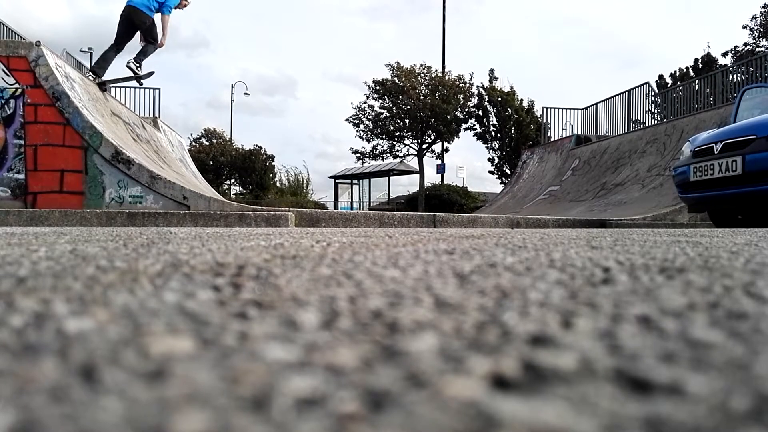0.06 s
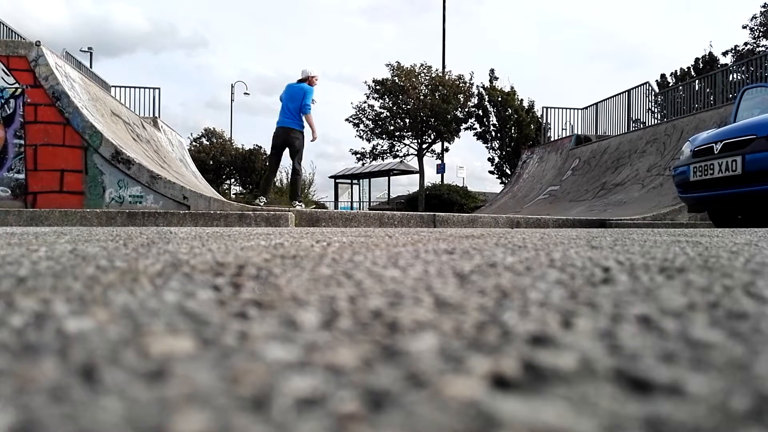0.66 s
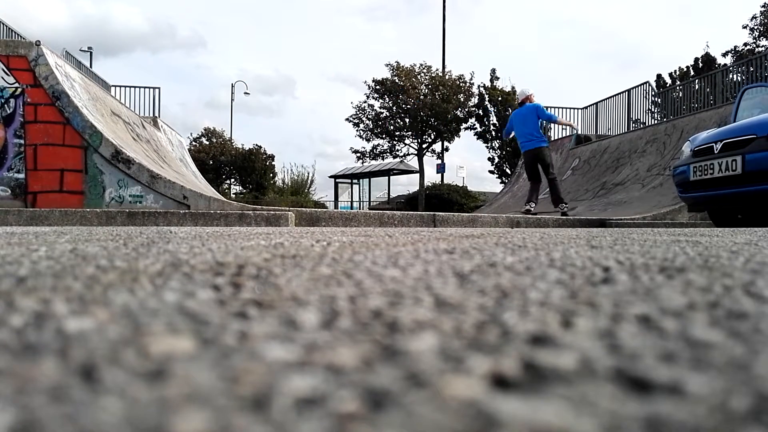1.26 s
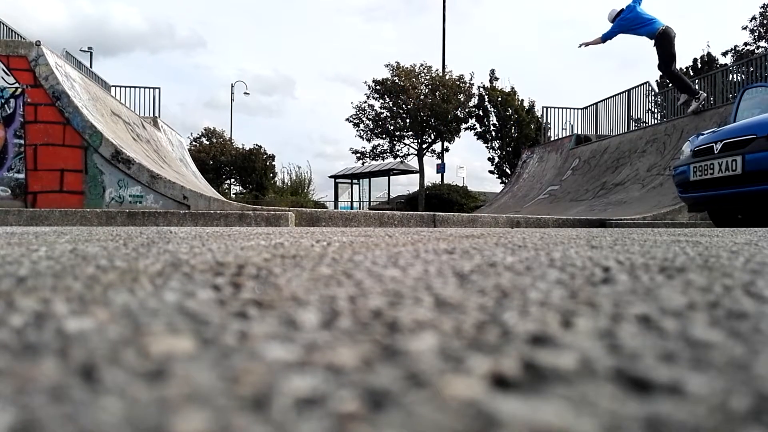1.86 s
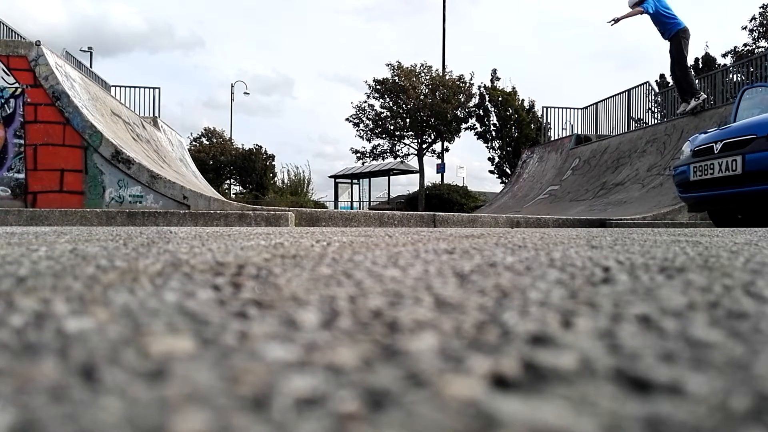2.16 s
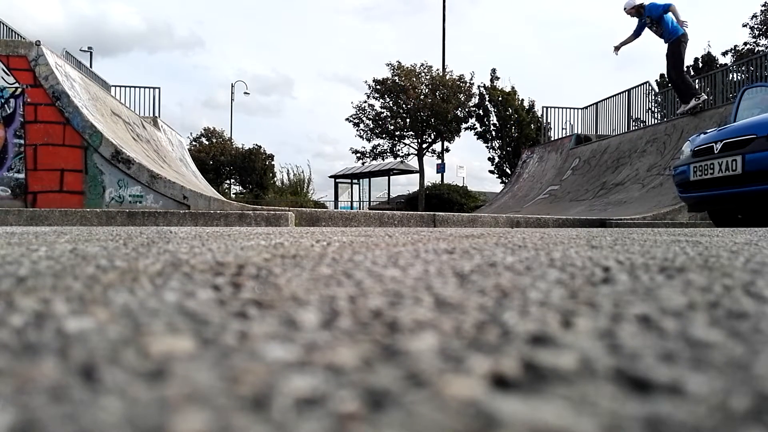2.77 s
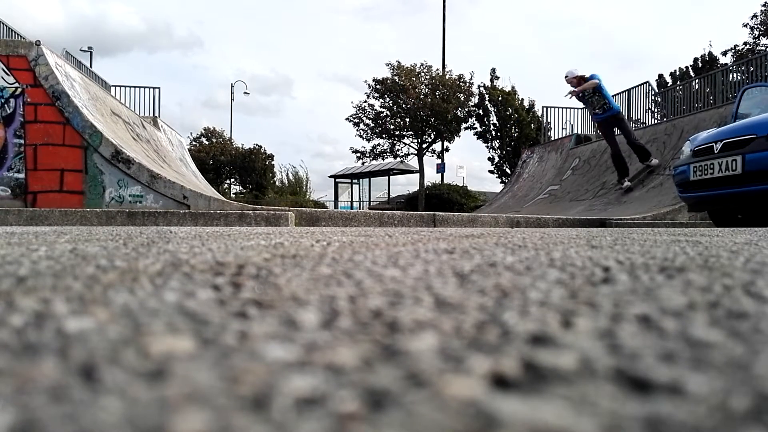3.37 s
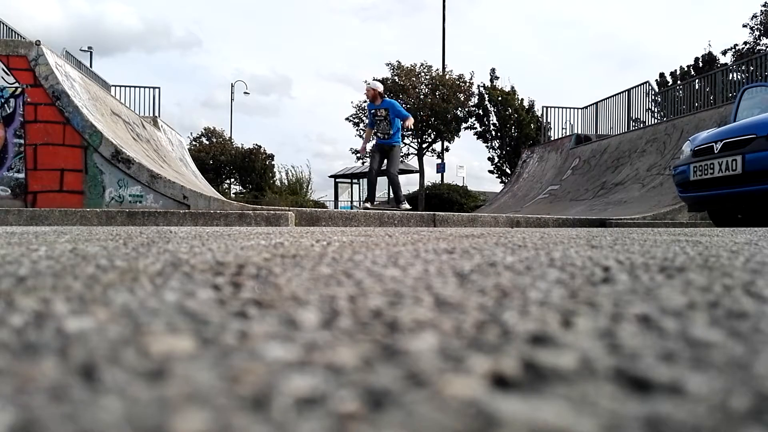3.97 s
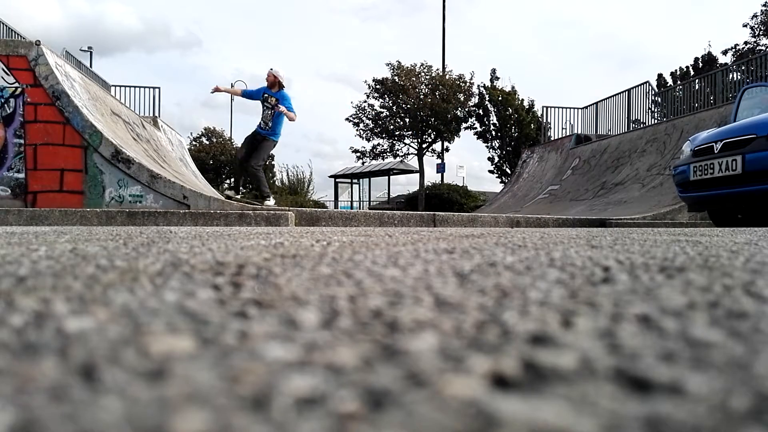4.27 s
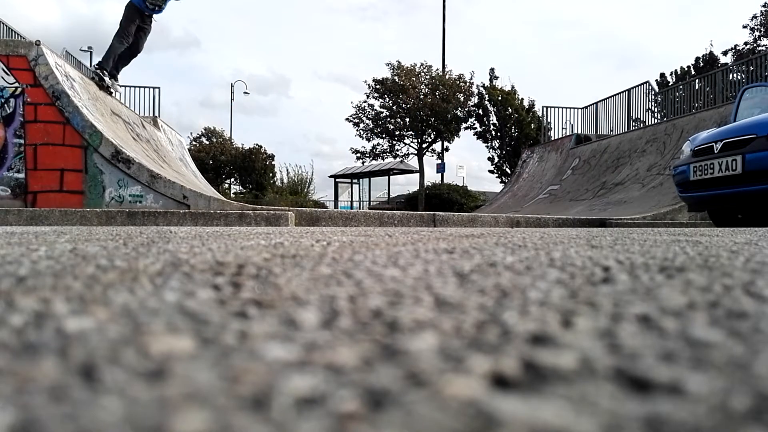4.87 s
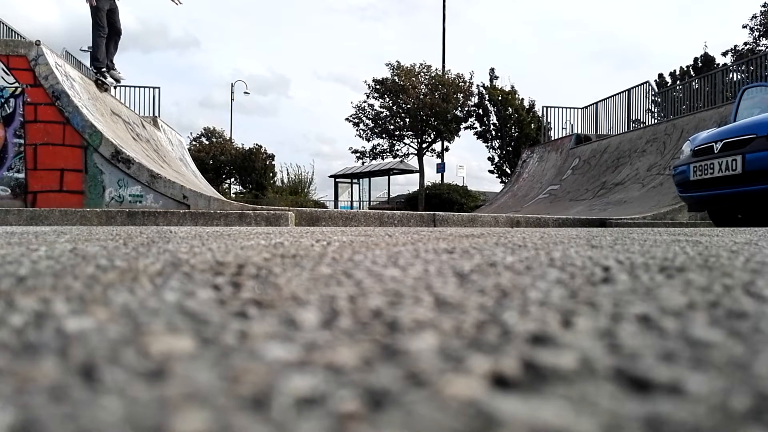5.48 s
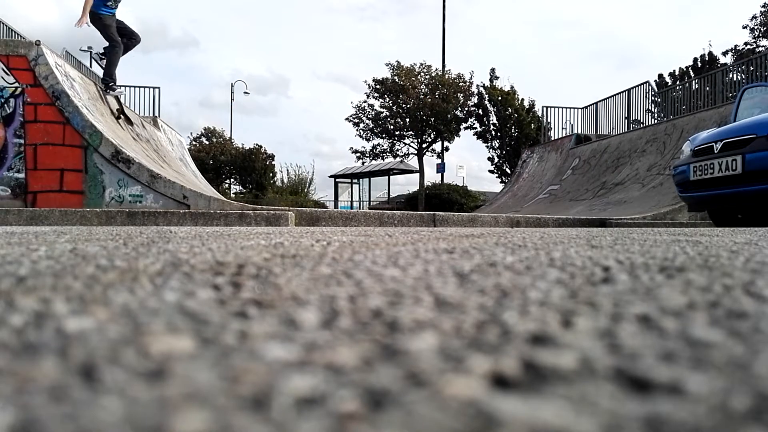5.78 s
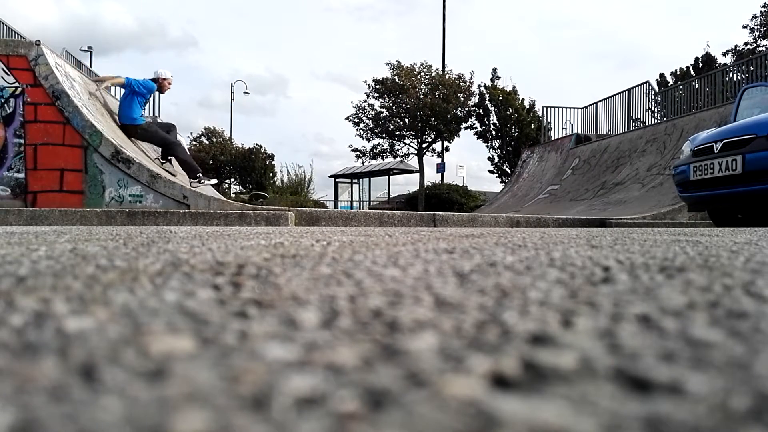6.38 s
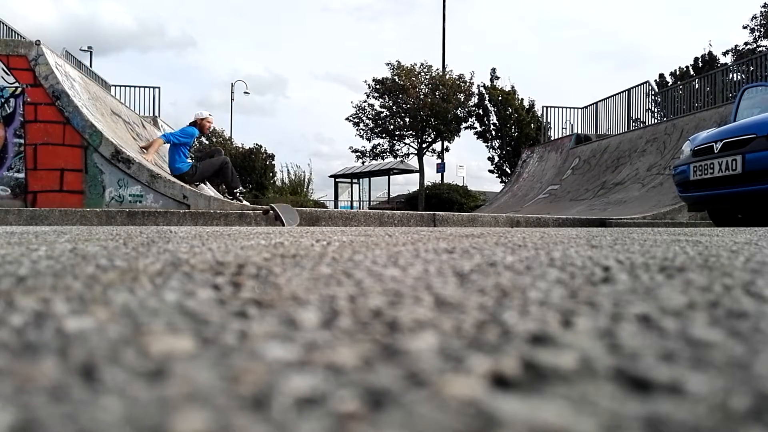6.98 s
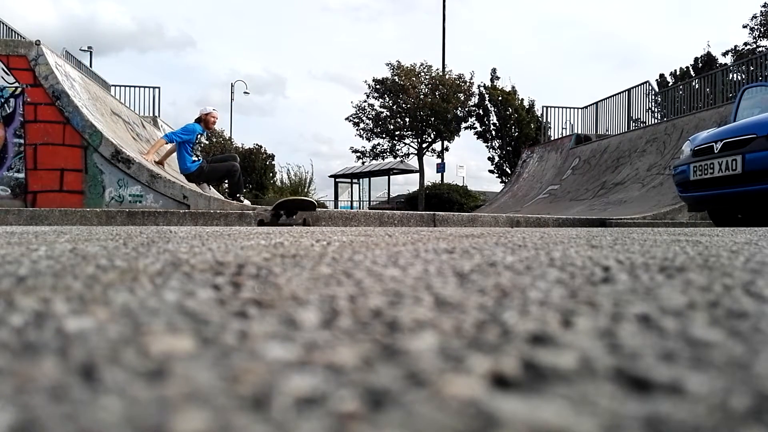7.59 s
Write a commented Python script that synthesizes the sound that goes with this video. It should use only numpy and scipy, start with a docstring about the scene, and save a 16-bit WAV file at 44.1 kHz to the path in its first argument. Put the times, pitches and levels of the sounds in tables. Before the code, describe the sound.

A skateboard rolls back and forth between concrete ramps, clanks on metal edges, then scrapes down and hits the ground with a sharp clack.

```python
"""Skateboard between two ramps

A rider rolls between two concrete ramps, stalls on each steel coping, then bails: the board
scrapes down, slaps the ground and rattles away. Rough concrete shakes the wheels; blows clink
the trucks and ring the deck. A camera on the asphalt hears it through two close ports, with
an echo from the ramps, a light breeze and far traffic."""
import sys
import numpy as np
from scipy import signal
from scipy.fft import rfft, irfft, next_fast_len
from scipy.io import wavfile
from scipy.ndimage import map_coordinates

SR = 44100
rng = np.random.default_rng(int(sys.argv[2]) if len(sys.argv) > 2 else 0)


def generate_wav(sig):
    """Save sig (samples, or channels by samples) to the path in sys.argv[1] as 16-bit PCM at SR."""
    pcm = np.round(np.clip(np.atleast_2d(sig).T, -1, 1) * 32767).astype(np.int16)
    wavfile.write(sys.argv[1], SR, pcm)


N = 336302

# Source spectra. Each row: frequency in Hz, relative density in dB.
BREEZE_SPECTRUM = [(15, -13), (30, -4.5), (52, 1.5), (80, -1), (130, -9), (250, -17), (600, -50)]
DRONE_SPECTRUM = [(70, -13.5), (120, -3.5), (155, -1.5), (183, -4.5), (215, -4.5), (290, -5), (450, -22.5),
                  (1000, -46.5)]
TRAFFIC_SPECTRUM = [(150, -4), (300, 8.5), (450, -12), (620, -24), (850, 0.5), (1150, 6), (1500, 2.5),
                    (2000, 0.5), (3900, -5), (5000, -9), (7000, -14.5), (14000, -21)]
ROAR_SPECTRUM = [(90, -12.5), (180, -13.5), (320, 2), (520, 1.5), (700, 0), (920, 2.5), (1250, -9),
                 (1700, -12), (2600, -22.5), (4000, -30), (8000, -77)]
RATTLE_SPECTRUM = [(300, -43), (700, -15), (1000, 8), (1250, 2.5), (1550, 8), (1850, 5), (2200, 1),
                   (3000, -5.5), (4500, -7.5), (8000, -20)]
GRIT_SPECTRUM = [(1500, -66), (2800, -1), (4000, 1.5), (5300, 6), (7000, -1), (9000, 2.5), (11000, 2.5),
                 (14000, -6.5)]
BEARING_SPECTRUM = [(1500, -4), (2600, 3), (3300, 3.5), (4100, 5), (5000, 2), (5900, 2.5), (7000, 4),
                    (8000, -1), (9000, 3.5), (10200, -5), (11700, -4), (14000, -15)]
SCRAPE_SPECTRUM = [(1500, -32), (2700, -2), (4200, 1), (6000, 4), (7700, 0), (9300, 4.5), (10500, -1),
                   (12500, 2), (14000, -10)]
CLINK_SPECTRUM = [(1200, -37), (2500, 5), (3500, 14), (4400, 5.5), (5400, 4.5), (7000, -43), (14000, -5.5)]
CRACK_SPECTRUM = [(3500, -1.5), (6500, 1.5), (8500, -2), (11500, 3), (14000, -8.5)]
THUD_SPECTRUM = [(60, -45), (180, 4.5), (300, 4), (520, -1), (850, 6), (1300, -4), (3000, -24)]
CLACK_SPECTRUM = [(200, -7), (520, 4), (900, 2), (1300, 4), (1900, 2), (2700, -7.5), (4200, -11),
                  (9000, -29)]
JUDDER_SPECTRUM = [(200, -40), (500, -5.5), (830, 8.5), (1200, 1.5), (1850, 4), (3000, -8), (6000, -21)]
TAIL_SPECTRUM = [(300, -18), (1000, 0), (1500, 0.5), (2600, 0), (3500, -5), (5000, -2.5), (10000, 2.5)]
# Level curves. Each row: time in seconds, level in dB.
BREEZE_DB = [(0, -32), (.6, -41), (1.5, -44), (2.12, -36), (2.4, -42), (3.15, -47), (4.85, -41.5),
             (5.9, -44), (6.3, -37), (7.0, -46.5), (7.63, -42.5)]
DRONE_DB = [(0, -37.5), (.25, -49), (.42, -35.5), (.7, -41.5), (1.35, -42.5), (2.1, -46), (2.9, -49.5),
            (3.65, -45.5), (4.45, -37.5), (4.7, -44.5), (6.45, -41), (6.7, -42), (7.63, -53)]
SPIN_DB = [(6.8, -73), (6.92, -63), (7.05, -72), (7.3, -64), (7.45, -48), (7.63, -52)]
# Reverberation of the ramps. Each row: frequency in Hz, t60 in seconds.
TAIL_T60_S = [(200, 0.1), (1500, 0.42), (5000, 0.36), (14000, 0.093)]
# Board travel. Each row: start and end in seconds, place reached (0 first coping, 1 far coping).
BOARD_CROSSINGS = [(0.313, 1.747, 0.98), (3.164, 4.677, 0.036), (5.922, 6.72, 0.22)]
# Shadow of the camera body. Each row: place, treble left minus right in dB.
SHADE_DB = [(0, -46), (.05, -17), (.11, -6.5), (.3, -10.5), (.65, 0), (.93, 0), (1, -34)]
# Port imbalance. Each row: frequency in Hz, left minus right in dB.
PORT_TILT_DB = [(250, -0.5), (700, 2.3), (1100, 2.5), (1650, 4.5), (2400, 1.5), (4500, 1), (7500, 4.5),
                (13000, -1)]
# Likeness of wheel noise at the ports. Each row: frequency in Hz, coherence.
WHEEL_COHERENCE = [(400, 1), (1000, 0.74), (2000, 0.8), (5000, 0.41), (8000, 0.17), (12000, 0.05)]
# Narrow hums. Each row: start and end in seconds, centre and resonator width in Hz, level in dB.
HUMS = [(.97, 1.708, 542, 189, -32.5), (3.66, 4.206, 718, 130, -38), (4.3, 5.894, 181, 35.2, -43.5)]
# Hollow tones under the wheels (the 4.72 s one from juddering wheels). Each row: time in seconds, pitch in Hz,
# level in dB, t60 in seconds, # left minus right in dB.
HOLLOW_BOOMS = [(1.265, 417, -11.5, 0.032, 1.5), (1.332, 511, -10.5, 0.087, 0.5), (1.399, 558, -18, .09, 1),
                (4.724, 741, -11, 0.064, -3)]
# Board edge dragging. Each row: start and end in seconds, level in dB, fade in dB per second.
EDGE_SCRAPES = [(5.957, 6.053, -34.5, -2), (6.083, 6.325, -32.5, 13), (6.319, 6.553, -35.5, 13),
                (6.529, 6.794, -37, 75)]
# Sideways slides. Each row: start and end in seconds, hiss and judder gains in dB.
WHEEL_SKIDS = [(0.355, 0.393, -40, -41), (1.784, 1.817, -46, -33.5), (4.624, 4.663, -30, -28),
               (4.628, 4.745, -31, -27), (4.719, 4.738, -20.5, -23.5), (5.744, 5.787, -44.5, -42.5),
               (5.906, 5.938, -39.5, -39), (5.939, 5.961, -35.5, -33.5)]
# Rolling. Each row: start and end in seconds, roar, rattle and grit gains in dB.
ROLL_SPANS = [(0, 0.37, -54, -56.5, -72.5), (0.348, 1.695, -37, -54.5, -61),
              (1.945, 2.04, -48.5, -45.5, -56), (2.098, 3.255, -54.5, -81, -90),
              (3.238, 3.336, -44.5, -45.5, -62), (3.347, 4.788, -42, -46.5, -60.5),
              (4.85, 4.927, -50, -50, -57), (4.937, 5.496, -48.5, -53.5, -97),
              (5.464, 5.918, -47.5, -50.5, -64), (5.962, 6.56, -45, -38, -51.5),
              (6.59, 7.63, -50.5, -48.5, -59)]
# Wheel load at a ramp's foot. Each row: time and half width in seconds, roar rise in dB.
RAMP_LOADS = [(.56, 0.18, 8.5), (1.46, 0.19, 8.5), (3.545, 0.13, 13), (4.41, 0.14, 11.5)]
# Drift in turns. Each row: time and half width in seconds, grit and rattle rises in dB.
TURN_DRIFTS = [(.69, 0.22, 12.5, 15.5), (1.53, 0.21, 13.5, 12.5), (3.52, 0.068, 17, 0),
               (4.56, 0.16, 16.5, 6)]
# Deck modes. Each row: frequency in Hz, level in dB, t60 in seconds before extra damping.
DECK_MODES = [(187, -10.5, 0.091), (291, -16, 0.045), (514, -8, 0.034), (703, -5, 0.042), (984, -11, 0.02),
              (1161, 2, 0.031), (1284, 2.5, 0.019), (1533, -1.5, 0.041), (1822, 2.5, 0.038),
              (2090, -9, 0.034), (2450, -5, 0.02), (2790, -9, 0.013), (3380, -11.5, 0.016),
              (4100, -13, 0.016)]
# Concrete joints. Each row: time in seconds, speed in m/s, front and rear wheel gains in dB.
JOINT_HITS = [(0.7051, 5.8, -19.5, -21), (1.2645, 5.27, -23, -18), (3.647, 5.9, -28, -25.5),
              (4.218, 5.1, -26, -21.5)]
# Wheels on ramp, trucks on coping; the faint clack at 4.93 s repeats the strike just before. Each row: time in
# seconds, gain, hardness and knock in dB.
WHEEL_LANDINGS = [(0.3521, -16.5, 2.5, 4), (0.3614, -25.5, 1, 4), (0.38, -26, -3, 6.5),
                  (0.3891, -27.5, 3.5, -10), (1.796, -21, -11, -6.5), (1.8422, -35.5, 0.5, 6),
                  (3.2691, -18, -15, -0.5), (3.277, -24, -11, -4), (3.288, -29, -16, 8),
                  (3.296, -22.5, -17, -9), (5.722, -23.5, 6, 1.5), (5.85, -32, -1, -10),
                  (5.8567, -22, 0, 2)]
COPING_STRIKES = [(1.9457, -19.5, -1.5, 7.5), (1.994, -37.5, -3, 19.5), (2.006, -38, -3, 5),
                  (2.023, -38, -3, 5), (2.037, -25.5, -12, 4), (2.098, -42, -18, -2),
                  (2.6216, -48, -10, -2), (3.114, -50, 5, 21.5), (4.785, -11, -8.5, 3.5),
                  (4.821, -29, -2, 11), (4.8534, -23, 2, 9), (4.895, -11, 0.5, 4), (4.9303, -28, 1, 14.5),
                  (5.4968, -35, -6, 1), (5.5229, -25, -6, -3), (5.589, -32.5, -3, 12),
                  (5.9882, -25.5, 7, 13), (6.0635, -20.5, 9, -7), (6.065, -23.5, 8, -19)]
# Riderless board skipping down. Each row: time in seconds, gain in dB.
BOARD_SKIPS = [(6.175, -21.5), (6.291, -28), (6.359, -22), (6.4402, -22.5), (6.465, -38), (6.535, -20),
               (6.549, -40), (6.58, -25.5)]
# Loose board on the ground. Each row: time in seconds, gain in dB, relative tick gain in dB.
TUMBLE_HITS = [(6.797, -3.5, -29), (6.799, -11, -30), (6.8316, -23, -21), (6.889, -26.5, -21),
               (6.9131, -24.5, -8.5), (7.0104, -40.5, -3), (7.0142, -29.5, -38), (7.0724, -38, -5),
               (7.1066, -34, -11), (7.124, -40, -18), (7.184, -40, -3.5), (7.2059, -29, -14.5),
               (7.2425, -31, -14), (7.261, -32, -18), (7.295, -36, -13), (7.348, -35.5, -3.5),
               (7.3546, -23, -8.5), (7.39, -42, -14), (7.428, -33, -7), (7.457, -30.5, -9.5),
               (7.506, -32, -8.5), (7.531, -25.5, -11), (7.567, -39, -14), (7.5936, -30, -9.5)]
# Blow recipes. Each: clink, crack, thud, wood.
JOINT_MIX_DB, LANDING_MIX_DB = (-9, -36, 4.5, -2.5), (-2, 9.5, 4, -6)
STRIKE_MIX_DB, SKIP_MIX_DB = (6.5, 5.5, -10, -9.5), (0.5, 3, -28, 3)


def amp(db):
    """Decibels to gain."""
    return 10 ** (np.asarray(db) / 20)


def unit(x):
    """Scale to rms 1."""
    return x / np.sqrt(np.mean(x ** 2) + 1e-20)


def along(points, hz):
    """Interpolate (Hz, value) points on a log axis."""
    knots_hz, values = np.transpose(points)
    return np.interp(np.log(hz + 1), np.log(knots_hz + 1), values)


def curve(points):
    """Interpolate (seconds, value) points per sample."""
    return np.interp(np.arange(N) / SR, *np.transpose(points))


def wobble(knots_per_s):
    """Smooth random curve."""
    knots = rng.standard_normal(int(N * knots_per_s / SR) + 4)
    return map_coordinates(knots, [np.arange(N) * knots_per_s / SR])


def filtered(x, response):
    """Apply a complex frequency response."""
    n = x.shape[-1]
    size = next_fast_len(n + 4096)
    return irfft(rfft(x, size) * response(np.fft.rfftfreq(size, 1 / SR)), size)[..., :n]


def coloured(x, spectrum):
    """Shape by a spectrum, at rms 1."""
    return unit(filtered(x, lambda hz: amp(along(spectrum, hz))))


def resonance(hz, centre_hz, width_hz):
    """Causal response of one mode."""
    return 1j * hz * width_hz / (centre_hz ** 2 - hz ** 2 + 1j * hz * width_hz)


def add(track, start_s, sound):
    """Mix a sound into the track."""
    part = track[round(start_s * SR):][:len(sound)]
    part += sound[:len(part)]


def diffuse(pair, apart_hz=2600):
    """Sound from all sides: alike at both ports until the wavelength nears their spacing."""
    mid, side = filtered(pair, lambda hz: np.sqrt((1 + np.sinc(hz / apart_hz) * [[1], [-1]]) / 2))
    return np.array([mid + side, mid - side])


def air():
    """Lumpy breeze, low drone, even wash of far traffic."""
    def wash(spectrum, apart_hz):
        return coloured(diffuse(rng.standard_normal((2, N)), apart_hz), spectrum)
    breeze = amp(curve(BREEZE_DB) + 2.5 * wobble(14)) * wash(BREEZE_SPECTRUM, apart_hz=630)
    drone = amp(curve(DRONE_DB) + 0.72 * wobble(11)) * wash(DRONE_SPECTRUM, apart_hz=1990)
    return breeze + drone + amp(-52.5) * wash(TRAFFIC_SPECTRUM, apart_hz=2620)


def tail(x, rise_s=0.013):
    """Thin scatter from concrete walls some metres off."""
    hz, t, noise = signal.stft(rng.standard_normal((2, SR // 4)), SR, nperseg=256)
    decay = amp(-60 * t / along(TAIL_T60_S, hz)[:, None]) * amp(along(TAIL_SPECTRUM, hz))[:, None]
    build_up = 1 - np.exp(-t / rise_s)
    impulse = diffuse(signal.istft(noise * decay * build_up, SR, nperseg=256)[1])
    return signal.fftconvolve(x[None], impulse / np.linalg.norm(impulse[0]), axes=1)[:, :len(x)]


def shifting_tail(x):
    """Paths change as the board moves: a new random tail per overlapping window."""
    out, window = np.zeros((2, N + SR)), signal.windows.hann(SR // 2, sym=False)
    hop = SR // 4
    padded = np.pad(x, (hop, SR))
    for i in range(0, N + hop, hop):
        wet = tail(np.pad(padded[i:i + len(window)] * window, (0, hop)))
        out[:, i:i + wet.shape[1]] += wet[:, :N + SR - i]
    return out[:, hop:hop + N]


def ramp_echo(x, delay_s, echo_db, tail_db):
    """One slap off the far ramp, plus the tail."""
    echo = filtered(x, lambda hz: resonance(hz, 1590, 1600) ** 2 * np.exp(-2j * np.pi * hz * delay_s))
    return amp(echo_db) * echo * amp([[2.5], [-2.5]]) + amp(tail_db) * shifting_tail(x)


def board_place():
    """Pendulum-like travel: slow at the ends, fastest midway."""
    t, place, before = np.arange(N) / SR, np.zeros(N), 0
    for start_s, end_s, reached in BOARD_CROSSINGS:
        progress = np.clip((t - start_s) / (end_s - start_s), 0, 1)
        place += (reached - before) * (1 - np.cos(np.pi * progress)) / 2
        before = reached
    return place


def ports(pair, shade_hz, near_lead_us=-172, far_lead_us=231):
    """One port hears the board first; the camera body shades the treble."""
    place = board_place()
    left_lead_us = near_lead_us + (far_lead_us - near_lead_us) * place
    shift_samples = left_lead_us * SR / 2e6
    shade_db = np.interp(place, *np.transpose(SHADE_DB))
    treble = filtered(pair, lambda hz: hz ** 6 / (hz ** 6 + shade_hz ** 6))
    gains = amp([shade_db / 2, -shade_db / 2])
    left, right = pair + (gains / np.sqrt(np.mean(gains ** 2, axis=0)) - 1) * treble
    return np.array([map_coordinates(left, [np.arange(N) + shift_samples]),
                     map_coordinates(right, [np.arange(N) - shift_samples])])


def spread(draws):
    """Two noise draws to left and right, less alike in the treble."""
    def weights(hz):
        angle = np.arccos(np.clip(along(WHEEL_COHERENCE, hz), 0, 1)) / 2
        return np.array([np.cos(angle), np.sin(angle)])
    mid, side = filtered(draws, weights)
    return np.array([mid + side, mid - side])


def whine():
    """Wheels sing on the flat; a low hum lasts through the second stall."""
    out = np.zeros(N)
    for start_s, end_s, centre_hz, width_hz, db in HUMS:
        swell = signal.windows.tukey(round((end_s - start_s) * SR), .5)
        noise = rng.standard_normal(len(swell))
        tone = filtered(noise, lambda hz: resonance(hz, centre_hz, width_hz) ** 2)
        add(out, start_s, amp(db) * swell * unit(tone))
    return out


def booms():
    """Hollow tones ring under the wheels: a ramp's curved face, and the juddering wheels at 4.72 s."""
    out, t = np.zeros((2, N)), np.arange(SR // 4) / SR
    for start_s, hz, db, t60_s, pan_db in HOLLOW_BOOMS:
        ring = amp(db - 60 * t / t60_s) * (1 - np.exp(-t / 0.0012)) * np.sin(2 * np.pi * hz * t)
        add(out[0], start_s, amp(pan_db / 2) * ring)
        add(out[1], start_s, amp(-pan_db / 2) * ring)
    return out


def rough_noise(spectrum, grains_per_s, fine_gain):
    """Two draws of contact noise: sparse grains on a fine surface."""
    grains = (rng.random((2, N)) < grains_per_s / SR) * rng.standard_normal((2, N))
    return coloured(unit(grains) + fine_gain * rng.standard_normal((2, N)), spectrum)


def bearing_whirr(spin_hz=31.5):
    """Free wheels spin on after the slam, pulsing each turn."""
    t = np.arange(N) / SR
    gain = (t > SPIN_DB[0][0]) * amp(curve(SPIN_DB))
    pulse = 1 + 0.45 * np.sin(2 * np.pi * spin_hz * t + wobble(8))
    return gain * pulse * rough_noise(BEARING_SPECTRUM, grains_per_s=1800, fine_gain=0.62)


def scrapes(catch_db=2.3):
    """The board's edge catches and slips, crushing grit in clumps."""
    t, gain = np.arange(N) / SR, np.zeros(N)
    for start_s, end_s, db, fade_db_per_s in EDGE_SCRAPES:
        contact = np.clip(np.minimum(t - start_s, end_s - t) / 0.016, 0, 1)
        gain += contact * amp(db - fade_db_per_s * np.clip(t - start_s, 0, end_s - start_s))
    catching = amp(catch_db * wobble(110))
    return gain * catching * rough_noise(SCRAPE_SPECTRUM, grains_per_s=1300, fine_gain=0.96)


def skids():
    """Urethane slips on concrete: abrupt hiss, juddering deck."""
    out = np.zeros(N)
    for start_s, end_s, hiss_db, judder_db in WHEEL_SKIDS:
        slip = signal.windows.tukey(round((end_s - start_s) * SR), 0.0097 / (end_s - start_s))
        fine, coarse = rng.standard_normal((2, len(slip)))
        hiss = amp(hiss_db + 6) * coloured(fine, GRIT_SPECTRUM)
        judder = amp(judder_db) * coloured(coarse, JUDDER_SPECTRUM)
        add(out, start_s, slip * (hiss + judder))
    return out


def wheel_gains(attack_s=0.033, release_s=0.12):
    """Roar, rattle and grit gains, swelling at ramp feet and in turns."""
    t, power = np.arange(N) / SR, np.zeros((3, N))
    swell = lambda s, width_s: np.exp(-.5 * ((t - s) / width_s) ** 2)
    for start_s, end_s, *levels_db in ROLL_SPANS:
        held = np.clip((t - start_s) / attack_s, 0, 1) * np.exp(-np.maximum(t - end_s, 0) / release_s)
        power += (amp(levels_db)[:, None] * held) ** 2
    load_db = sum(db * swell(s, width_s) for s, width_s, db in RAMP_LOADS)
    grit_db = sum(db * swell(s, width_s) for s, width_s, db, _ in TURN_DRIFTS)
    rattle_db = sum(db * swell(s, width_s) for s, width_s, _, db in TURN_DRIFTS) + 0.031 * load_db
    return np.sqrt(power) * amp([load_db, rattle_db, grit_db])


def rolling():
    """Rough concrete shakes wheels and deck; grit crackles under the urethane."""
    roar_gain, rattle_gain, grit_gain = wheel_gains()
    surface = wobble(35)
    roar_gain *= amp(1.96 * surface)
    roar = roar_gain * rough_noise(ROAR_SPECTRUM, grains_per_s=650, fine_gain=1.19)
    rattle_gain *= amp(2 + 0.32 * surface)
    rattle = rattle_gain * rough_noise(RATTLE_SPECTRUM, grains_per_s=430, fine_gain=1)
    grit_gain *= amp(6 + 1.7 * surface + 0.45 * wobble(96))
    grit = grit_gain * rough_noise(GRIT_SPECTRUM, grains_per_s=1900, fine_gain=1.06)
    return roar + rattle + grit


def burst(t, spectrum, t60_s):
    """Decaying coloured noise, peak 1."""
    x = coloured(rng.standard_normal(len(t)), spectrum) * amp(-60 * t / t60_s)
    return x / np.abs(x).max()


def deck_ring(t, damping, scatter_db, detune):
    """Struck deck modes, scattered in level and pitch, peak 1."""
    hz, db, t60_s = np.transpose(DECK_MODES)[:, :, None]
    size, shift, phase = rng.standard_normal((3, len(DECK_MODES), 1))
    cycles = hz * (1 + detune * shift) * t + phase
    envelopes = amp(db + scatter_db * size - 60 * t * damping / t60_s)
    ring = np.sum(envelopes * np.sin(2 * np.pi * cycles), axis=0) * (1 - np.exp(-t / 0.00078))
    return ring / np.abs(ring).max()


def blow(mix_db, hardness_db=0, knock_db=0):
    """Truck clink, a crack set by hardness, and a knock of wheel thud and deck ring."""
    clink_db, crack_db, thud_db, wood_db = mix_db
    t = np.arange(SR // 5) / SR
    clink = amp(clink_db) * burst(t, CLINK_SPECTRUM, t60_s=0.026)
    crack = amp(crack_db + hardness_db) * burst(t, CRACK_SPECTRUM, t60_s=0.027)
    thud = amp(thud_db) * burst(t, THUD_SPECTRUM, t60_s=0.049)
    wood = amp(wood_db) * deck_ring(t, damping=0.67, scatter_db=1.5, detune=0.097)
    return clink + crack + amp(knock_db) * (thud + wood)


def blows(wheelbase_m=0.36):
    """Double bumps over joints, landings, coping strikes, riderless skips."""
    out = np.zeros(N)
    for start_s, speed_m_per_s, front_db, rear_db in JOINT_HITS:
        add(out, start_s, amp(front_db) * blow(JOINT_MIX_DB))
        add(out, start_s + wheelbase_m / speed_m_per_s, amp(rear_db) * blow(JOINT_MIX_DB))
    for hits, mix_db in (WHEEL_LANDINGS, LANDING_MIX_DB), (COPING_STRIKES, STRIKE_MIX_DB):
        for start_s, db, hardness_db, knock_db in hits:
            add(out, start_s, amp(db) * blow(mix_db, hardness_db, knock_db))
    for start_s, db in BOARD_SKIPS:
        add(out, start_s, amp(db) * blow(SKIP_MIX_DB))
    return out


def tumble(pan_db=2.4):
    """Loose board, to the left: an edge lands, bearings jingle, then the deck slaps flat."""
    out, t = np.zeros(N), np.arange(SR // 5) / SR
    for start_s, db, tick_db in TUMBLE_HITS:
        thud = amp(-2 + 1.45 * db) * burst(t, THUD_SPECTRUM, t60_s=0.045)  # only hard hits boom
        clink = amp(-4) * burst(t, CLINK_SPECTRUM, t60_s=0.048)
        jingle = amp(12.5) * burst(t, BEARING_SPECTRUM, t60_s=0.093)
        ring = amp(2.5) * deck_ring(t, damping=1, scatter_db=1, detune=0.0094)
        clack = amp(-1.5) * burst(t, CLACK_SPECTRUM, t60_s=0.021)
        add(out, start_s, thud + amp(db + tick_db) * (clink + jingle))
        add(out, start_s + 0.00351, amp(db) * (ring + clack))
    return out * amp([[pan_db / 2], [-pan_db / 2]])


def scene():
    """Moving board, echoes, open air."""
    wheels = rolling() + np.array([skids(), skids()]) + scrapes() + bearing_whirr()
    body = whine() + booms() + blows() + tumble()
    direct = ports(spread(wheels) + body, shade_hz=5800)
    echoes = ramp_echo(wheels[0] + body.mean(axis=0), delay_s=.036, echo_db=-12, tail_db=-15)
    return direct + echoes + air()


def record(dry):
    """The camera widens the low mids, favours the left, clips at full scale and cuts the top."""
    mid, side = (dry[0] + dry[1]) / 2, (dry[0] - dry[1]) / 2
    side = filtered(side, lambda hz: 1 + 2.8 * resonance(hz, centre_hz=440, width_hz=380))
    wide = np.array([mid + side, mid - side])
    tilted = filtered(wide, lambda hz: amp(along(PORT_TILT_DB, hz) * [[.5], [-.5]]))
    return filtered(np.clip(tilted, -1, 1), lambda hz: 1 / (1 + (hz / 14500) ** 160))


dry = scene()
out = record(dry)
generate_wav(out)
```